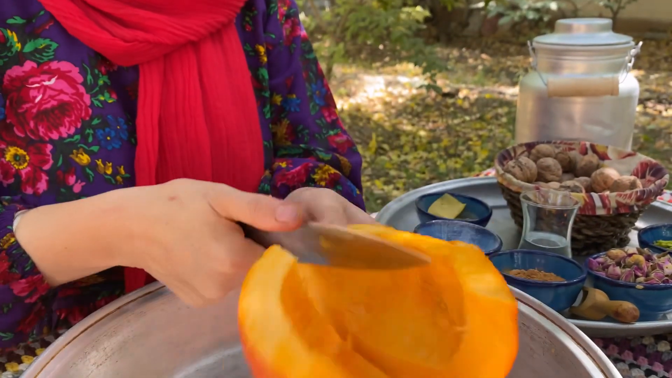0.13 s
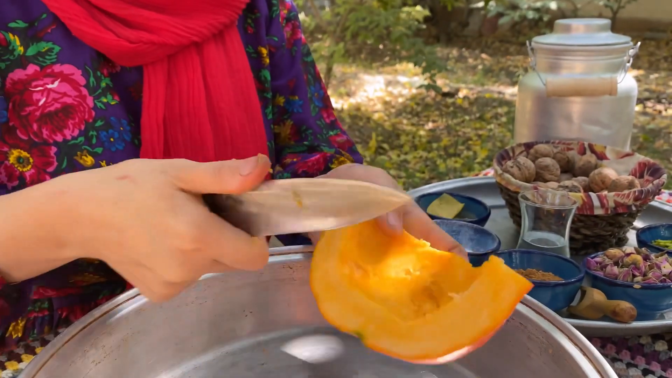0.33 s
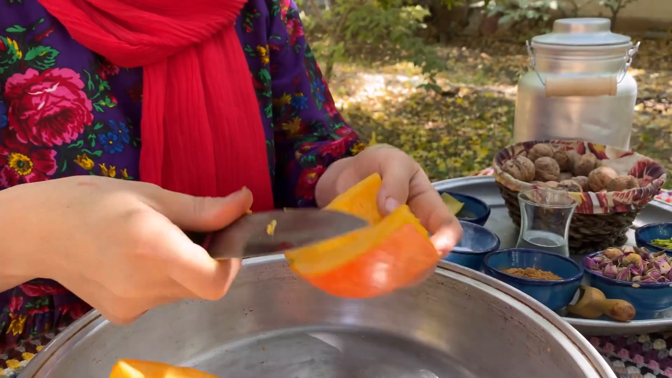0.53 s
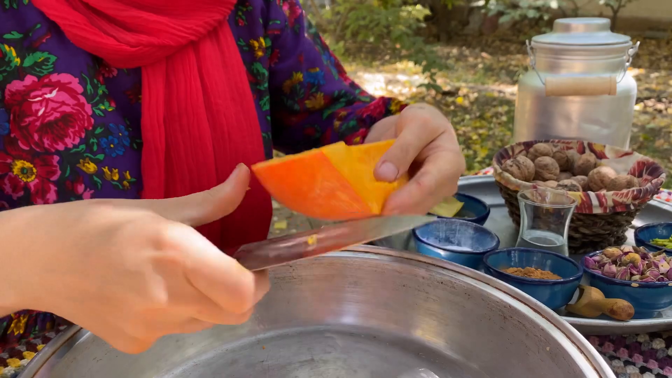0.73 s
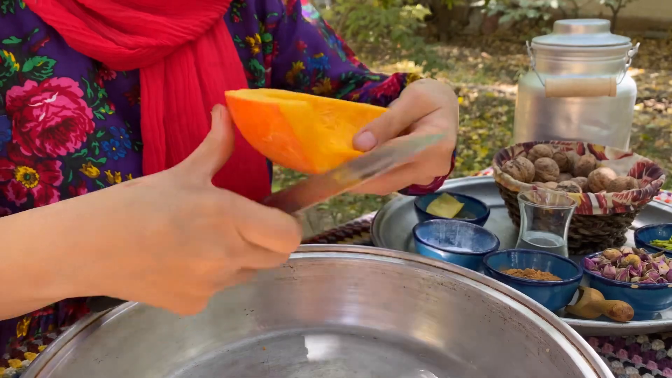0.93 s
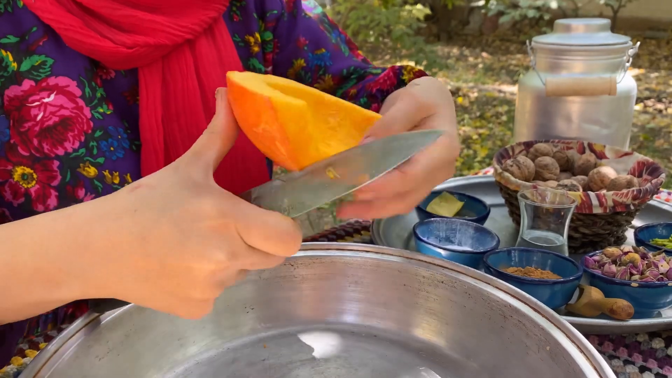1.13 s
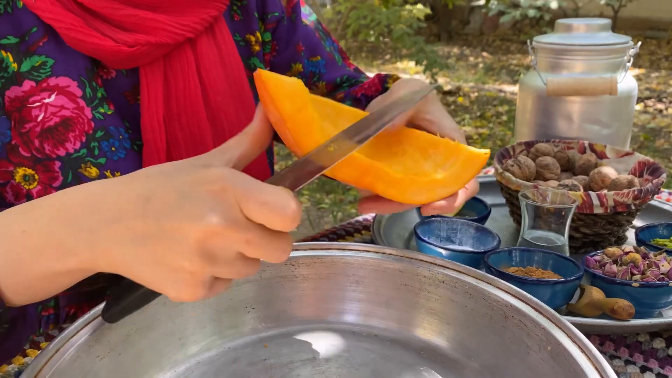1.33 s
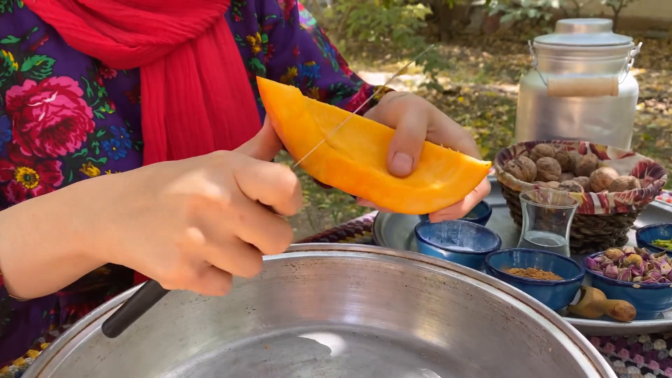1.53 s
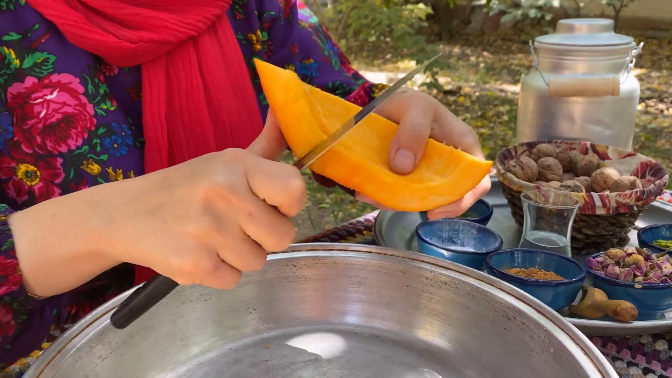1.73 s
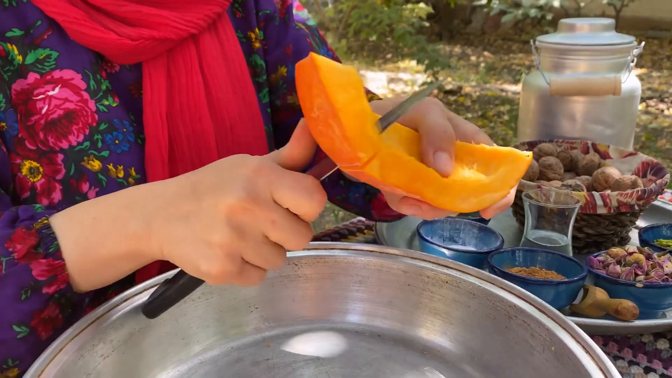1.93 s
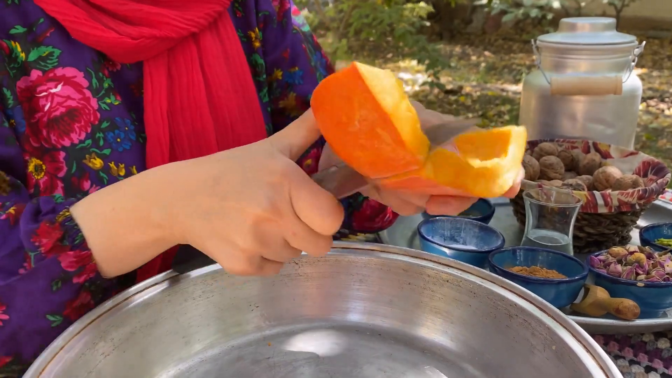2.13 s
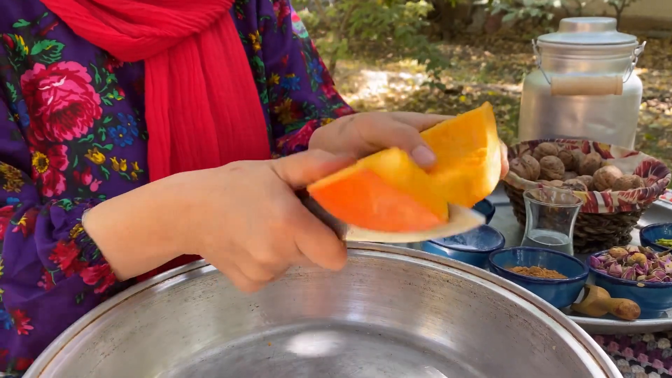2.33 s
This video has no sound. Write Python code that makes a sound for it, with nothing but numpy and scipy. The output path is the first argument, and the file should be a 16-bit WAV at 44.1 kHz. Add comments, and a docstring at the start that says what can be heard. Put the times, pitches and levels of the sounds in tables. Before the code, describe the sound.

Raw pumpkin being cut with a knife: wet crunches, a hollow basin knock, crisp double snap

```python
"""Raw pumpkin is cut over a wide steel basin on an outdoor table, close to the microphone, in a quiet garden.
The blade crunches through (bursts of cell clicks); a chunk knocks and rocks in the basin (cracks, steel modes)
while basin and table boom (sagging low sines), and flesh rubs (ragged hiss). The knife clacks twice, scraping
before and after (noise rings the steel), then crunches into a slice. It splits in two snaps, the second
double (cracks, flesh, basin and blade modes), with a scrape between and a last small crunch."""
import sys
import numpy as np
from scipy import signal
from scipy.fft import rfft, irfft, next_fast_len
from scipy.io import wavfile

SR = 44100
rng = np.random.default_rng(int(sys.argv[2]) if len(sys.argv) > 2 else 0)


def store_pcm(level_fs):
    """Save levels as 16-bit WAV."""
    pcm = np.round(np.clip(level_fs, -1, 1) * 32767).astype(np.int16)
    wavfile.write(sys.argv[1], SR, np.atleast_2d(pcm).T)


N = 103635
SIZE = next_fast_len(N, True)  # FFT length

# modes of the steel basin: f/Hz, level/dB, t60/s
BASIN_MODES = [(465.3, -7, 0.073), (655.3, 1, 0.04), (861, 1.5, 0.028), (994, -1, 0.019), (1095.6, -7, .11),
               (1298, -18, .11), (1469, -12.5, 0.083), (1718, -14, 0.1), (2354, -12.5, 0.065),
               (2836, -17.5, 0.056), (3009, -5, 0.054), (3113, -13.5, 0.028), (4500, -9, 0.093),
               (7107, -10, 0.099)]
# modes of the knife, handle and blade: f/Hz, level/dB, t60/s
BLADE_MODES = [(168.7, 3, 0.12), (2230, 7.5, 0.052), (2520, -2.5, 0.076), (3056, -5.5, 0.056),
               (3670, -8, 0.063), (4223, -4, 0.045), (4960, -8.5, 0.039), (5310, -18, 0.081)]
BASIN_CRACK_DB = -4  # crack against basin ring, in knocks and clacks


def undb(db):
    """Decibels to gain."""
    return 10 ** (np.asarray(db) / 20)


def at(points, hz):
    """Read a table on a log-frequency axis."""
    p = np.array(points, float)
    return np.interp(np.log(np.maximum(hz, 1)), np.log(p[:, 0]), p[:, 1])


def unit(x):
    """Scale to rms 1."""
    return x / np.sqrt(np.mean(x ** 2))


def freqs():
    """Frequencies of the spectrum bins in Hz."""
    return np.fft.rfftfreq(SIZE, 1 / SR)


def colour(x, gain):
    """Filter by a gain per bin."""
    return irfft(rfft(x, SIZE) * gain, SIZE)[..., :N]


def stereo(pair, db):
    """Two unrelated signals as mid and side, coloured, as heard by two close ports; rms 1."""
    # stereo width: f/Hz, side to mid ratio
    side_ratio = [(60, 0.1), (300, 0.53), (1000, 0.84), (3000, 0.77), (10000, 1)]
    port_lag_s = 0.00007
    f = freqs()
    width = at(side_ratio, f)
    mid, side = rfft(pair, SIZE)
    side = side * width
    left = mid + side
    right = (mid - side) * np.exp(-2j * np.pi * f * port_lag_s)
    gain = undb(db) / np.hypot(1, width)
    return unit(irfft(np.array([left, right]) * gain, SIZE)[:, :N])


def noise(points):
    """Stereo noise of a given spectrum, rms 1."""
    return stereo(rng.standard_normal((2, N)), at(points, freqs()))


def add(out, start_s, x):
    """Mix a sound in at a time."""
    i = max(int(start_s * SR), 0)
    out[:, i:i + x.shape[1]] += x[:, :max(N - i, 0)]


def patchy():
    """Uneven colour: peaks and dips a few hundred Hz wide, drawn anew for each stroke and each set of cracks."""
    patchy_db, patch_hz = 4.2, 150
    f = freqs()
    grid_hz = np.arange(0, SR / 2, patch_hz)
    unevenness = np.interp(f, grid_hz, rng.standard_normal(len(grid_hz)))
    return undb(patchy_db * np.clip(f / 2000, 0, 1) * unevenness)  # full depth from 2 kHz


def catching():
    """Uneven grip: a gain that fluctuates fast as the surfaces catch and slip; rms 1."""
    ragged_db, ragged_hz = 2.2, 320
    lowpass = 1 / (1 + (freqs() / ragged_hz) ** 2)
    grip = unit(colour(rng.standard_normal(N), lowpass))
    return unit(undb(ragged_db * grip))


def contact(x, low, mid, high, top=None, size=512):
    """Minimum-phase filter: how strongly one blow drives lows, mids, highs and top, in dB."""
    # corners of the drive: f/Hz for low, mid, mid, high, top
    corners_hz = [470, 650, 1100, 2300, 6000]
    top_drop_db = 19  # unless given, the top is driven less than the highs by this
    top = high - top_drop_db if top is None else top
    gain_db = at(list(zip(corners_hz, [low, mid, mid, high, top])), np.fft.rfftfreq(size, 1 / SR))
    # folding the cepstrum onto positive time makes the filter causal
    cepstrum = irfft(np.log(undb(gain_db)))
    cepstrum[1:size // 2] *= 2
    cepstrum[size // 2 + 1:] = 0
    impulse = irfft(np.exp(rfft(cepstrum)))
    return signal.fftconvolve(x, impulse[None], axes=1)


def ring(modes, t):
    """Modes start together and decay as close, beating pairs; the left port leads in phase on average."""
    lead_rad, mode_spread = 0.7, 0.18  # spread grows up to 1.5 kHz
    pair_split, rise_s = 0.017, 0.0026  # relative gap of a pair, scaled at random; rise time constant
    out, ears = np.zeros((2, len(t))), np.array([[1], [-1]])
    for (hz, db, t60_s), (twin, lean, lead) in zip(modes, rng.standard_normal((len(modes), 3))):
        spread = mode_spread * min(hz / 1500, 1)
        phase = 2 * np.pi * hz * t + ears * (lead_rad / 2 + spread * lead)
        beat_phase = 2 * np.pi * hz * pair_split * twin * t
        pair = np.sin(phase) + 0.5 * np.cos(phase + beat_phase)
        balance = 1 + ears * spread * lean / 2
        out += undb(db) * balance * pair * np.exp(-np.log(1000) * t / t60_s)
    return 0.5 * out * (1 - np.exp(-t / rise_s))


def cracks(count, t):
    """Bursts of coloured noise with a sharp first tick; the treble dies first."""
    # spectrum of a blow's crack: f/Hz, density/dB per Hz
    crack_spectrum = [(100, -10.5), (300, -1.5), (600, 7.5), (1300, -5), (5000, -1), (7200, 6), (9000, -17),
                      (12000, -17.5), (16000, -26.5)]
    # decay of the crack by band: f/Hz, t60/s
    crack_decay = [(1000, 0.075), (4000, 0.067), (10000, 0.047)]
    tick_db, tick_s = -12.5, 0.003
    source, f = colour(noise(crack_spectrum), patchy()), freqs()
    starts = rng.integers(0, N - len(t), count)
    out = np.zeros((count, 2, len(t)))
    for k, (_, t60_s) in enumerate(crack_decay):
        crossfade = [(row[0], j == k) for j, row in enumerate(crack_decay)]
        band = colour(source, at(crossfade, f))
        fall = np.exp(-np.log(1000) * t / t60_s) + undb(tick_db) * np.exp(-t / tick_s)
        out += np.array([band[:, i:i + len(t)] for i in starts]) * fall
    return out


def strokes(rows, source, fall_s):
    """Each stroke swells over a share of its length and dies away, with its own brightness."""
    swell_share = 0.3
    out, t = np.zeros((2, N)), np.arange(N) / SR
    octaves = np.log2(np.maximum(freqs(), 200) / 1000)  # from 1 kHz
    for start_s, length_s, db, tilt_db in rows:
        swell = 1 - np.exp(-2 * np.maximum(t - start_s, 0) / (swell_share * length_s))
        fall = np.exp(-np.maximum(t - start_s - length_s, 0) / fall_s)
        stroke = unit(colour(source, undb(tilt_db * octaves) * patchy()))
        out += undb(db) * swell * fall * stroke
    return out


def garden():
    """Quiet garden: steady stereo noise, strongest in the lows."""
    # spectrum of the garden: f/Hz, density/dB per Hz
    garden_spectrum = [(25, -4.5), (65, -0.5), (270, -13), (390, -24), (800, -26), (2500, -32),
                       (7100, -42.5), (9000, -57), (16000, -74)]
    level_db = -50.5
    return undb(level_db) * noise(garden_spectrum)


def echo(x):
    """Faint scatter from the table and the pots on it: a decaying noise tail."""
    level_db, t60_s, rise_s = -16, 0.17, 0.0033
    t = np.arange(SR // 2) / SR
    tail = rng.standard_normal((2, len(t))) * np.exp(-np.log(1000) * t / t60_s)
    tail = tail * np.minimum(t / rise_s, 1)
    tail = tail / np.sqrt(np.sum(tail ** 2) / 2)
    return undb(level_db) * signal.fftconvolve(x, tail, axes=1)[:, :N]


def friction():
    """Pumpkin rubs with a ragged hiss; the dragged blade sets itself and the basin ringing."""
    # rubs of pumpkin on steel and skin: t/s, length/s, level/dB, tilt/dB per octave
    rub_strokes = [(.32, 0.11, -51, -1.5), (.96, 0.2, -64.5, -3), (1.99, 0.056, -51.5, -3)]
    # spectrum of the rubbing: f/Hz, density/dB per Hz
    rub_spectrum = [(200, -4.5), (700, 1), (3500, -7), (7500, -7), (9000, -21), (11500, -8.5), (16000, -72)]
    # scrapes of blade on basin: t/s, length/s, level/dB, tilt/dB per octave
    scrape_strokes = [(.75, 0.02, -40, -5.5), (.83, 0.042, -51, -3), (2.018, 0.059, -37.5, -3.5)]
    rub_fall_s, scrape_fall_s, blade_db = 0.049, 0.011, -8
    t = np.arange(SR // 2) / SR
    steel = ring(BASIN_MODES, t) + undb(blade_db) * ring(BLADE_MODES[1:], t)  # without the lowest mode
    drive = rng.standard_normal(N) * catching()
    singing = signal.fftconvolve(drive[None], steel, axes=1)[:, :N]
    rubbing = strokes(rub_strokes, noise(rub_spectrum), rub_fall_s) * catching()
    return rubbing + strokes(scrape_strokes, singing, scrape_fall_s)


def booms():
    """The basin floor and table swing for a few slow cycles under each shift of weight."""
    # booms under the rocking chunk: t/s, level/dB
    boom_hits = [(0.192, -7), (0.206, -13.5), (0.279, -10), (0.335, -27), (0.403, -26.5), (0.467, -20),
                 (0.485, -18.5), (.649, -26), (0.684, -31.5), (0.755, -20.5), (0.808, -27), (0.963, -31.5),
                 (1.141, -34), (1.298, -36.5)]
    rise_s, fall_s, tail_db, tail_s = 0.0077, 0.014, -19.5, 0.025
    settled_hz, sag_hz, sag_s = 65.9, 45.6, 0.011  # each boom starts sharp and settles
    upper_ratio, upper_db = 2.1, -15.5
    out, t = np.zeros((2, N)), np.arange(SR // 2) / SR
    rise = np.sin(np.pi / 2 * np.minimum(t / rise_s, 1)) ** 2
    fall = np.exp(-(t / (2 * fall_s)) ** 2) + undb(tail_db) * np.exp(-t / tail_s)
    turn = 2 * np.pi * np.cumsum(settled_hz + sag_hz * np.exp(-t / sag_s)) / SR
    swing = -np.sin(turn) + undb(upper_db) * np.sin(upper_ratio * turn)
    balance_db = np.array([[-1.2], [1.2]])  # left, right
    for start_s, db in boom_hits:
        add(out, start_s, undb(db + balance_db) * swing * rise * fall)
    return out


def clacks():
    """The knife hits the basin; both ring."""
    # clacks of knife on basin: t/s, level/dB
    clack_hits = [(0.7654, -22.5), (0.7879, -24)]
    # drive of the basin: level/dB of lows, mids, highs
    drive_db = [5.5, 3.5, 1]
    out, t = np.zeros((2, N)), np.arange(SR // 4) / SR
    for (start_s, db), crack in zip(clack_hits, cracks(len(clack_hits), t)):
        struck = ring(BASIN_MODES, t) + undb(BASIN_CRACK_DB) * crack
        steel = contact(struck, *drive_db)[:, :len(t)]
        add(out, start_s, undb(db) * (steel + ring(BLADE_MODES, t)))
    return out


def bend(x):
    """Low bending waves cross the steel more slowly than high ones and radiate weakly."""
    radiation_hz, delay_s = 432, 0.0012  # poor radiation below; delay scale
    x = signal.sosfilt(signal.butter(4, radiation_hz, "high", fs=SR, output="sos"), x)
    f = freqs()
    slowness = np.sqrt(1000 / np.clip(f, 100, 4000)) - 0.5  # zero from 4 kHz
    # phase is the running sum of group delay over frequency
    return colour(x, np.exp(-2j * np.pi * np.cumsum(delay_s * slowness) * f[1]))


def knocks():
    """The chunk strikes the basin: a crack and the ring of the steel."""
    # knocks of chunk on basin: t/s, lows/dB, mids/dB, highs/dB
    knock_hits = [(0.1859, -16, 3.5, -11.5), (0.2691, -10, -16.5, -25.5), (0.292, -33, -24.5, -38.5),
                  (0.394, -29.5, -31.5, -41), (0.456, -21, -32.5, -45), (0.476, -23.5, -25, -37.5),
                  (0.642, -20.5, -34.5, -51), (0.682, -30.5, -40.5, -64), (.956, -33, -44.5, -47),
                  (1.189, -36.5, -45.5, -59)]
    out, t = np.zeros((2, N)), np.arange(SR // 4) / SR
    for (start_s, *drive_db), crack in zip(knock_hits, cracks(len(knock_hits), t)):
        struck = ring(BASIN_MODES, t) + undb(BASIN_CRACK_DB) * crack
        add(out, start_s, contact(struck, *drive_db))
    return out


def snaps():
    """The slice splits: its flesh rings briefly, the freed blade pings and the basin below answers."""
    # snaps: t/s, lows/dB, mids/dB, highs/dB, top/dB, flesh ring/dB, basin ring/dB, blade ring/dB
    snap_hits = [(1.912, -12, -13, -14.5, -33.5, -2, -26, -43),
                 (2.041, -18.5, -18.5, -32.5, -44, -0.5, 5, -22),
                 (2.0562, -10.5, -8, -15.5, -36.5, -14, 2, 25)]
    # modes of the slice on the blade: f/Hz, level/dB, t60/s
    flesh_modes = [(364, -4, 0.041), (518, -3.5, 0.049), (986, 11, 0.039), (1280, 3, 0.031),
                   (1386, 9.5, 0.03), (1612, -1.5, 0.07), (2010, -6.5, 0.071), (2620, -5.5, 0.088)]
    crack_db, edge_tilt_db = -4, 22  # tilt per octave: the ping favours the blade's high modes
    out, t = np.zeros((2, N)), np.arange(SR // 4) / SR
    top_mode_hz = BLADE_MODES[-1][0]
    edge = [(hz, db + edge_tilt_db * np.log2(hz / top_mode_hz), t60_s) for hz, db, t60_s in BLADE_MODES]
    for row, crack in zip(snap_hits, cracks(len(snap_hits), t)):
        start_s, *drive_db, flesh_db, basin_db, blade_db = row
        body = undb(flesh_db) * ring(flesh_modes, t) + undb(basin_db) * ring(BASIN_MODES, t)
        add(out, start_s, contact(body + undb(crack_db) * crack, *drive_db))
        add(out, start_s, undb(blade_db + drive_db[-1]) * ring(edge, t))  # relative to the top
    return out


def crunches():
    """Cells burst in a dense train of tiny clicks; the flesh tears in uneven spurts as the blade advances."""
    # strokes of blade through flesh: t/s, length/s, level/dB, tilt/dB per octave
    crunch_strokes = [(.021, 0.016, -38, -4.5), (.058, 0.018, -30.5, -4), (.082, 0.012, -43, -8.5),
                      (.306, 0.007, -48, -8), (1.281, 0.02, -53.5, -8.5), (1.475, 0.0023, -46.5, -7),
                      (1.706, 0.016, -54, -3), (1.749, 0.019, -43.5, -1.5), (1.793, 0.024, -42, -1.5),
                      (1.826, 0.044, -39.5, -1), (1.876, 0.028, -41.5, -1.5), (1.9475, 0.0021, -37.5, -2),
                      (2.327, 0.0092, -44, 0)]
    # spectrum of the crunch as picked up, with notches of the microphone port: f/Hz, density/dB per Hz
    crunch_spectrum = [(200, -23), (600, -16), (1150, -5.5), (1700, -7), (4000, -5), (7300, -3.5),
                       (9100, -19), (10200, -5), (11800, -7), (13300, -30), (15300, -6)]
    cells_per_s, cell_spread_db, fall_s = 2600, 3, 0.0035
    bursts = rng.random((2, N)) < cells_per_s / SR
    sizes = undb(cell_spread_db * np.minimum(rng.exponential(size=(2, N)), 4))
    signs = rng.choice([-1, 1], (2, N))
    clicks = stereo(bursts * sizes * signs, at(crunch_spectrum, freqs()))
    return strokes(crunch_strokes, clicks, fall_s) * catching()


def scene():
    """All the handling sounds and their echo over the quiet garden."""
    near = bend(knocks()) + clacks() + snaps() + booms() + crunches() + friction()
    return near + echo(near) + garden()


def record(dry):
    """The recorder cuts the deepest rumble and the top."""
    low_cut_hz, top_hz = 23, 15800
    dry = signal.sosfilt(signal.butter(2, low_cut_hz, "high", fs=SR, output="sos"), dry)
    return signal.sosfilt(signal.ellip(8, 0.2, 80, top_hz, fs=SR, output="sos"), dry)


dry = scene()
out = record(dry)
store_pcm(out)
```